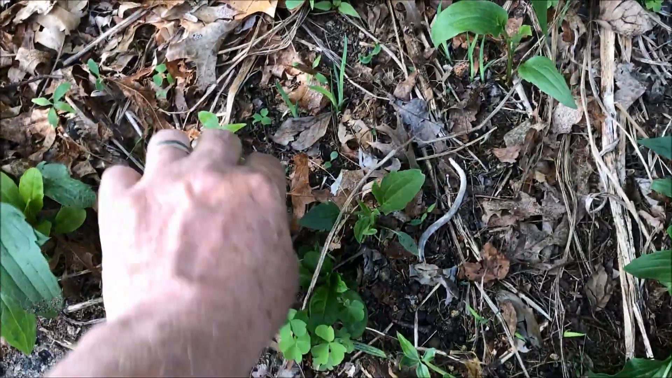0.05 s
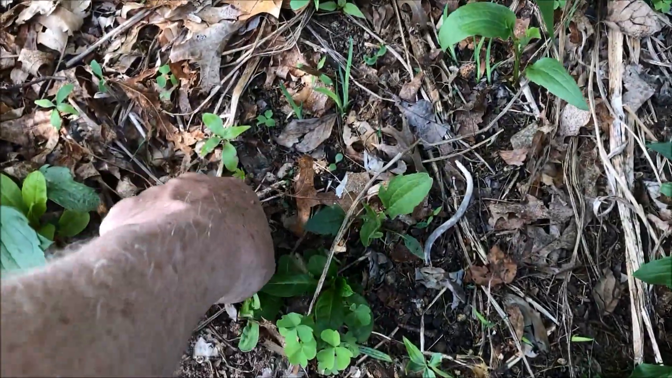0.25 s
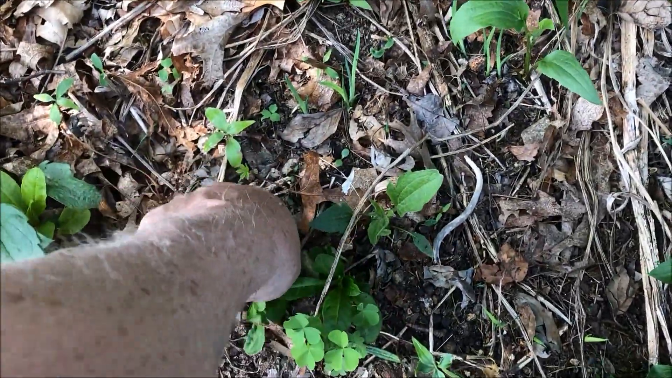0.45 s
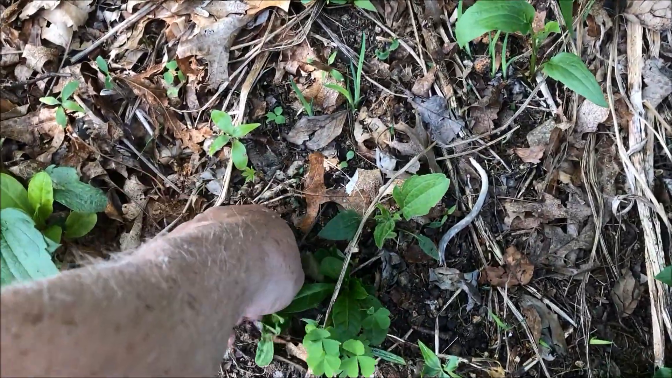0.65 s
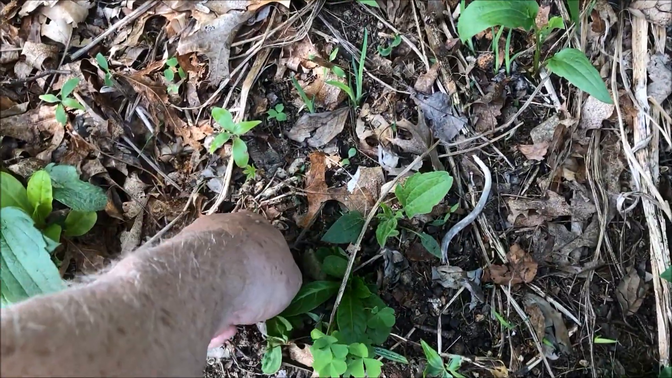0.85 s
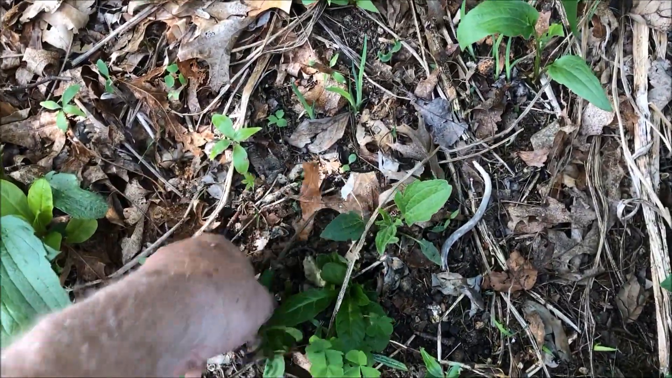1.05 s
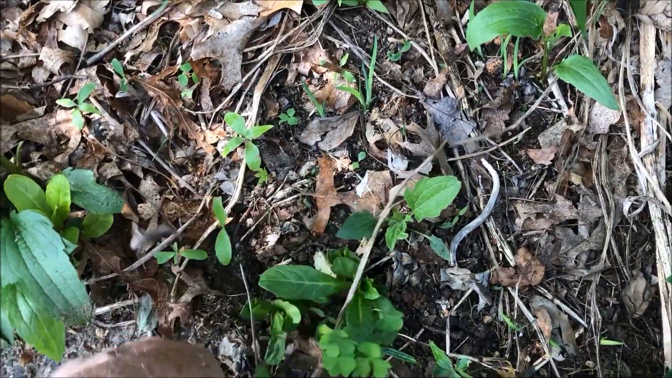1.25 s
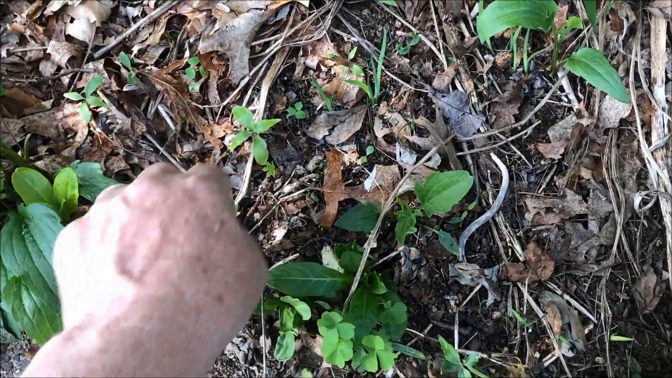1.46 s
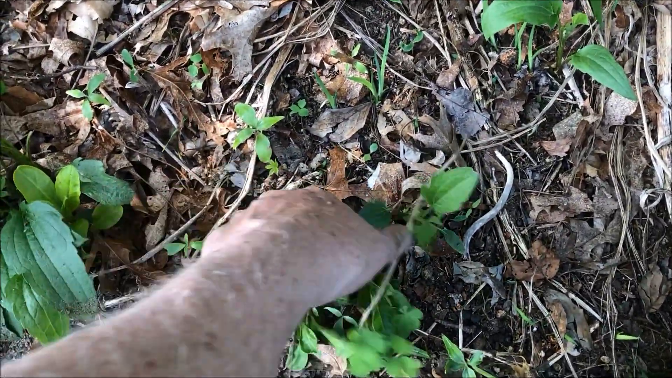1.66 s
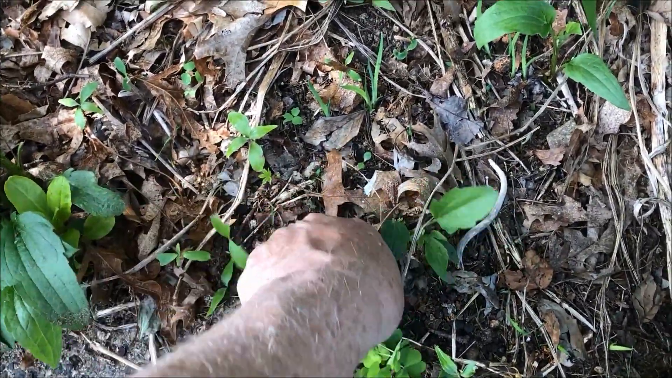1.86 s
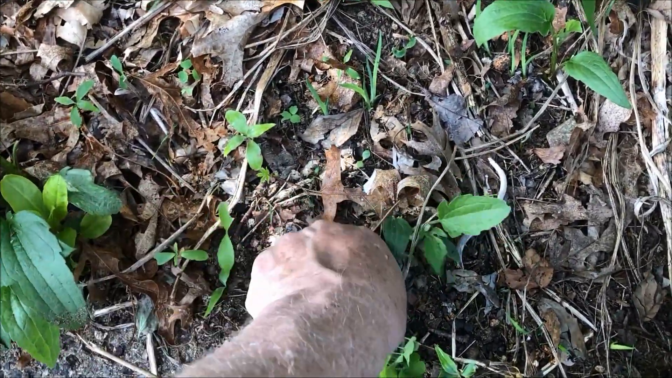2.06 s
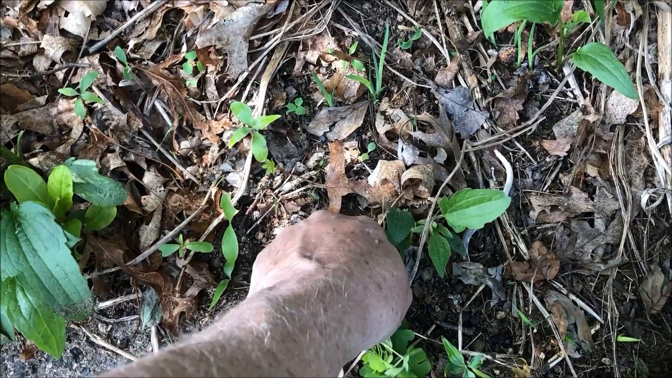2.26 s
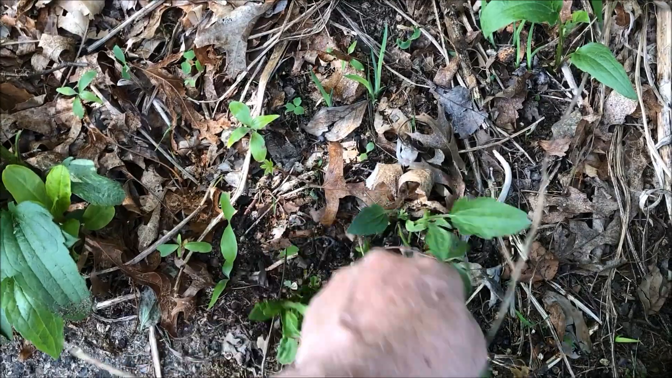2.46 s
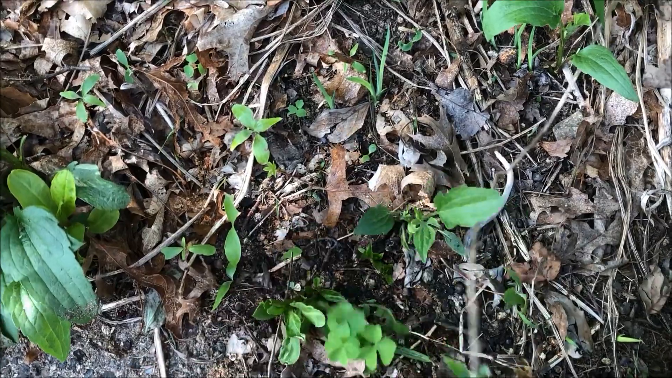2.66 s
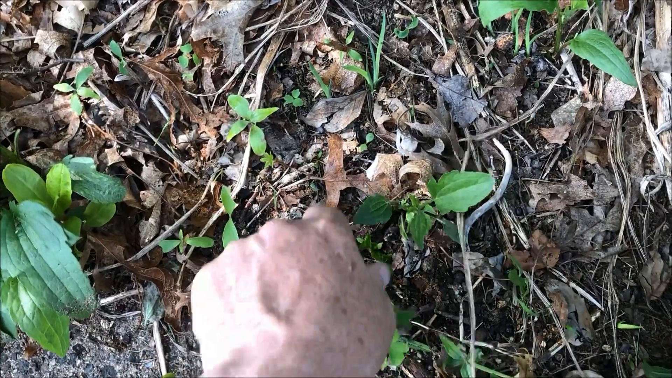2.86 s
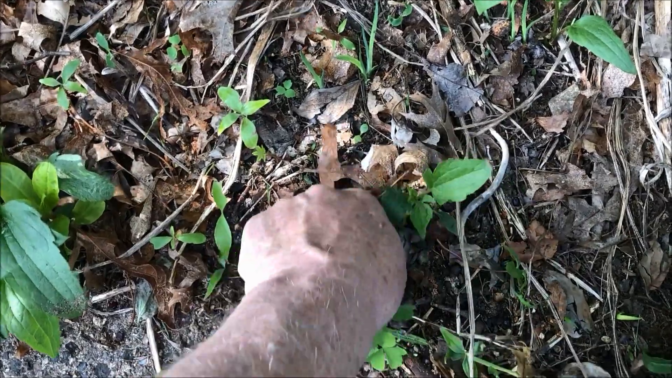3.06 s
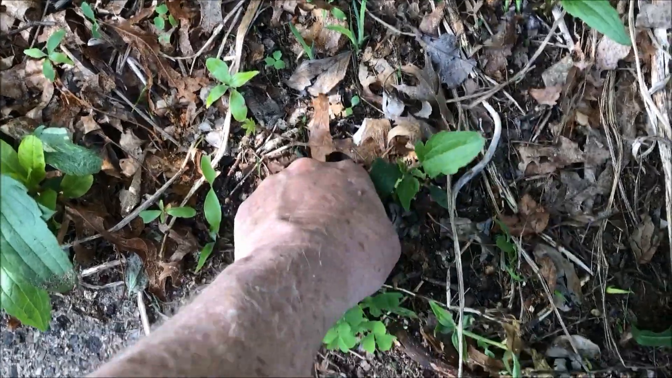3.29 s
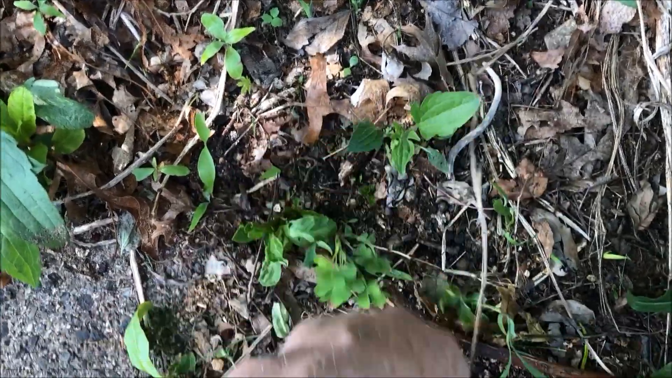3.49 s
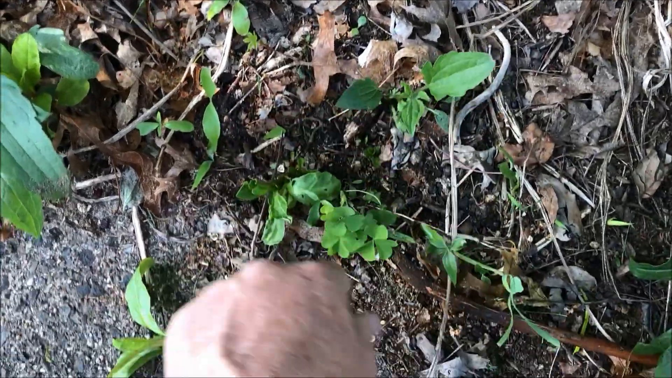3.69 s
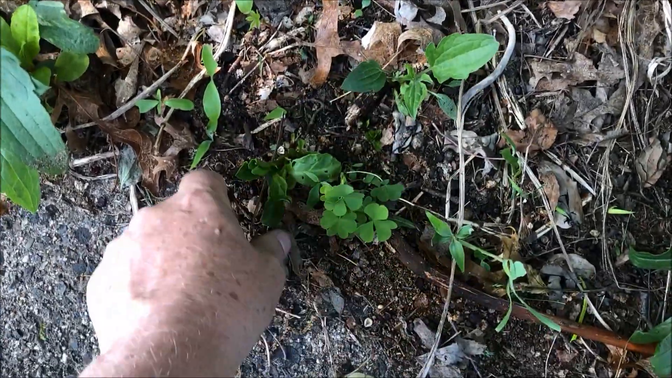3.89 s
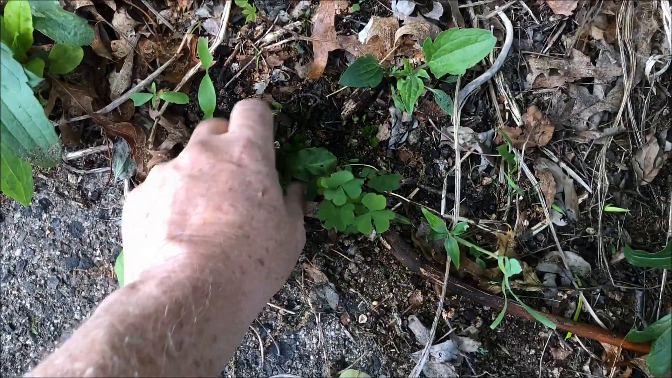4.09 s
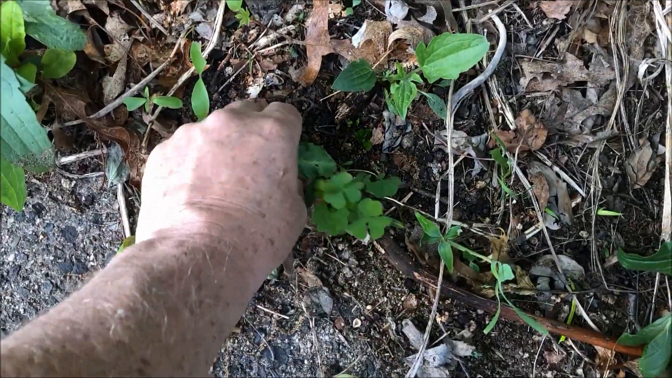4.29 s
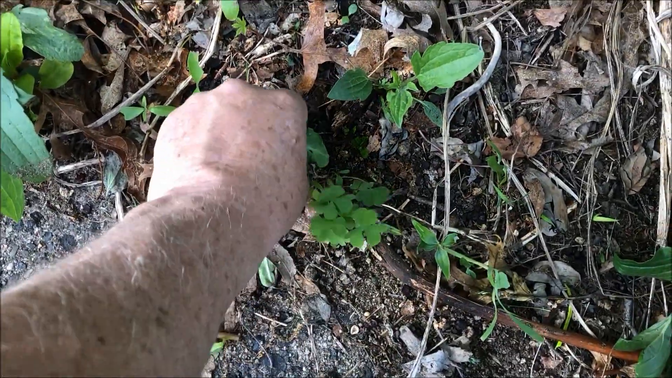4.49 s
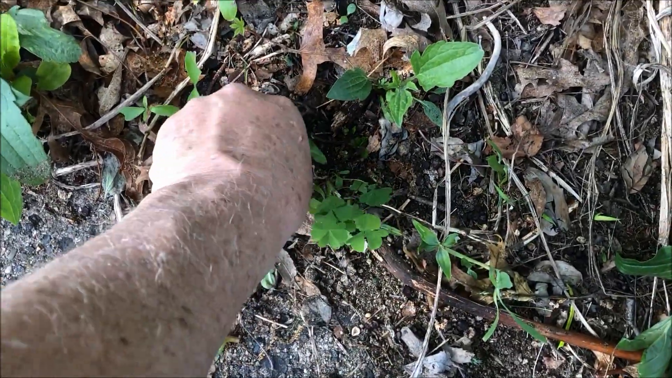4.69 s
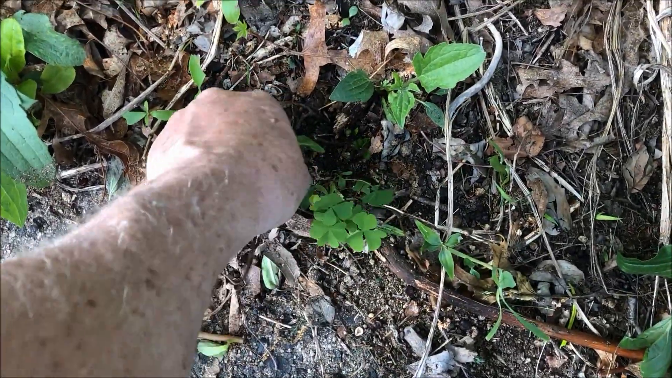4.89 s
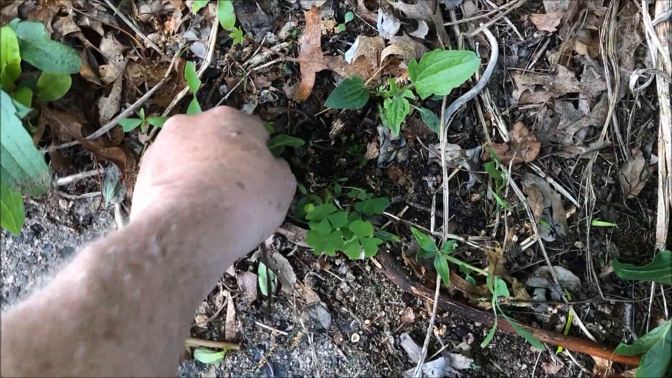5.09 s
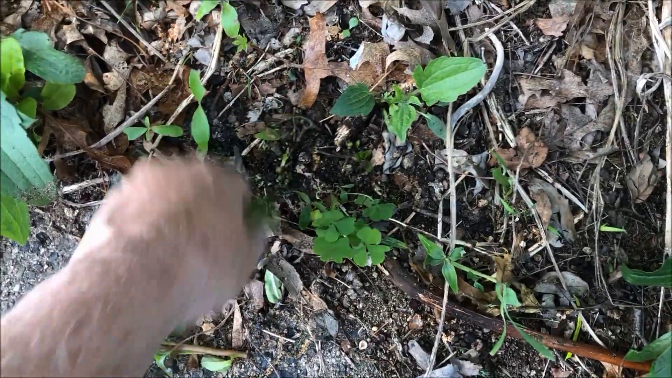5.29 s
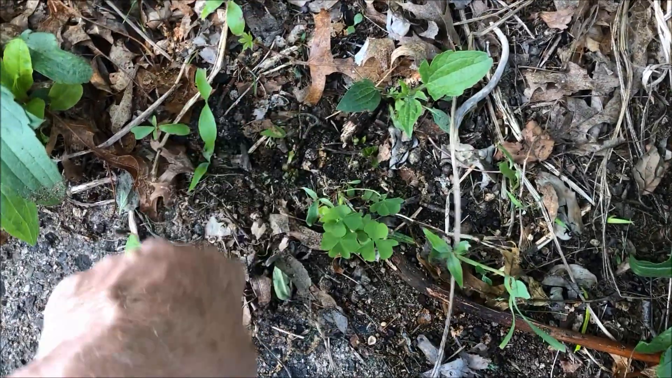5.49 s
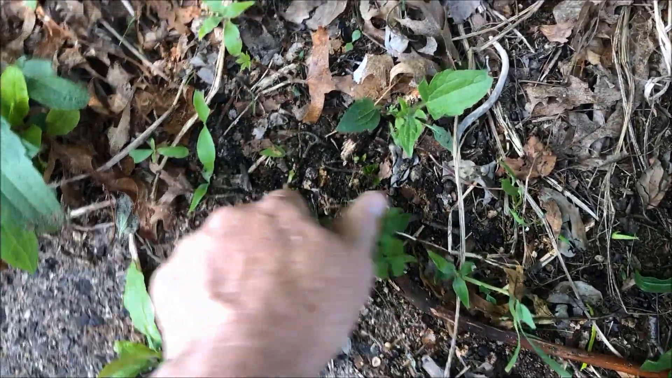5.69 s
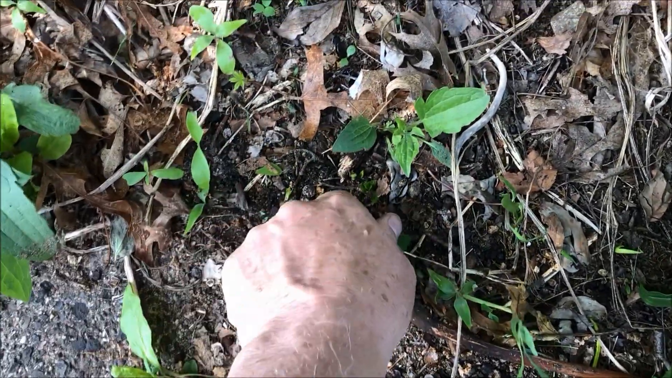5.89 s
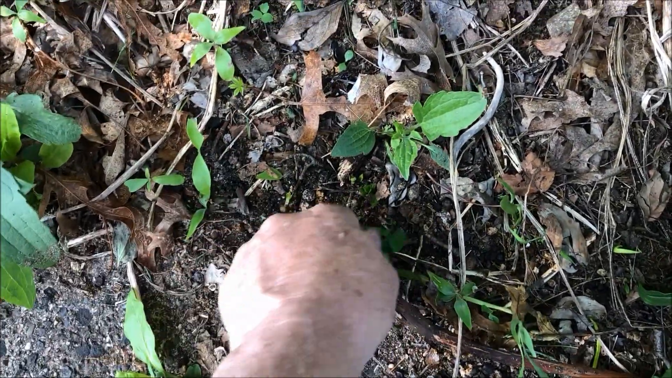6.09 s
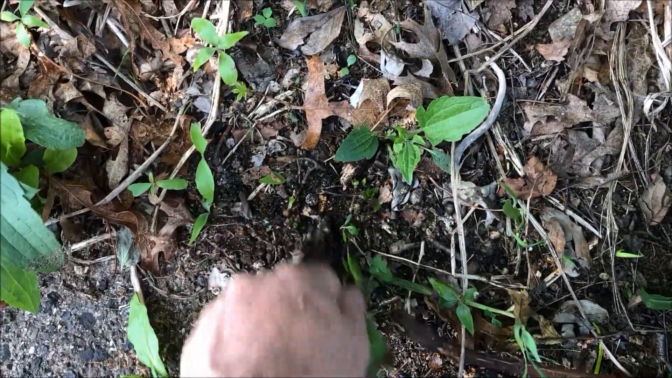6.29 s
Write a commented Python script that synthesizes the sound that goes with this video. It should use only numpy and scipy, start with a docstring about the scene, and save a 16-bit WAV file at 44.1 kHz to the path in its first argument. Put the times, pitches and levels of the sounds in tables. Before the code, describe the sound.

Close up and outdoors, a hand pulls small weeds from garden soil. Dry leaves rustle in short, uneven strokes full of tiny crisp ticks, with a duller crunch of soil crumbs and brief rubbing of stems. Roots break with a few bright snaps, each with a slight low thump, the sharpest coming late. Distant traffic rumbles softly under a faint hum.

```python
"""Pulling weeds by hand

A hand pulls small weeds out of garden soil, close up. Dry leaves and soil crumbs rustle as dense tiny
clicks with every stroke, and stems rub as they slide out. Roots and stems snap with a bright crack that
sinks into a short low thump. Far traffic rumbles under a faint hum."""
import sys
import numpy as np
from scipy import signal
from scipy.fft import rfft, irfft, next_fast_len
from scipy.io import wavfile
from scipy.ndimage import uniform_filter1d

SR = 44100
rng = np.random.default_rng(int(sys.argv[2]) if len(sys.argv) > 2 else 0)


def unload_wav(signal):
    """Save mono or channel-first audio to the path in sys.argv[1] as 16-bit WAV at rate SR, clipped to [-1, 1]."""
    wavfile.write(
        sys.argv[1],
        SR,
        np.round(np.clip(np.atleast_2d(signal).T, -1, 1) * 32767).astype(np.int16),
    )


N = 279858


def undb(db):
    return 10 ** (np.asarray(db) / 20)


def level(x, db):
    """Set the rms level."""
    return x * undb(db) / np.sqrt(np.mean(x ** 2))


def colour(x, points):
    """EQ a sound through (Hz, dB) points on a log-frequency axis."""
    size = next_fast_len(len(x))
    hz, db = np.transpose(points)
    log_hz = np.log(np.fft.rfftfreq(size, 1 / SR) + 1)
    gain = undb(np.interp(log_hz, np.log(hz), db))
    return irfft(rfft(x, size) * gain, size)[:len(x)]


def band(x, hz, width_hz):
    """One resonance."""
    return signal.lfilter(*signal.iirpeak(min(hz, SR / 3), hz / width_hz, fs=SR), x)


def drift(rate_hz):
    """Smooth random modulation with a spread near 1."""
    hold = int(SR / rate_hz)
    steps = np.repeat(rng.standard_normal(N // hold + 1), hold)
    return 1.26 * uniform_filter1d(uniform_filter1d(steps, hold), hold)[:N]


def add_at(track, start_s, sound):
    """Mix a sound into a track."""
    start = int(start_s * SR)
    track[start:start + len(sound)] += sound[:N - start]


def crackle(per_s, spread_db, t60_s):
    """Random breakages, many small and few large, each a noise grain that dies fast."""
    timing, size = rng.random((2, N))
    size_db = np.minimum(-spread_db * np.log(1 - size), 11.0)
    hits = (timing < per_s / SR) * undb(size_db)
    decay = np.exp(-2 * np.log(1000) / (t60_s * SR))
    power = signal.lfilter([1], [1, -decay], hits ** 2)
    envelope = np.sqrt(np.abs(uniform_filter1d(power, size=SR // 500)))
    return envelope * rng.standard_normal(N)


# Each brush or grip of the hand in the litter. Swell and fade span 10 dB; soil is relative to leaf.
# peak_s, leaf_gain_db, swell_s, fade_s, soil_gain_db
HAND_STROKES = [(.25, -64, .04, .3, -6.5), (0.571, -59, .15, .25, -5), (.73, -57, .1, .12, -6.5),
                (.81, -58.5, 0.08, .04, -13), (.89, -65.5, .05, 0.14, -5.5), (1.03, -53, .08, 0.23, -13),
                (1.22, -49, .08, 0.13, -19.5), (1.36, -52.5, .08, .06, -11), (1.425, -56, .05, .06, -12),
                (1.49, -60, .06, .03, -12), (1.66, -63, .02, .1, -9), (1.735, -57, .06, .03, -9),
                (1.775, -57, .05, 0.16, -9.5), (1.878, -54.5, 0.07, .05, -10), (2.031, -58, .04, .07, -8),
                (2.229, -60, 0.15, .1, -14), (2.378, -66, .04, .04, -12), (2.455, -52, .025, 0.1537, -8),
                (2.62, -46, .06, 0.0937, -13), (2.849, -58.5, .06, .05, -11), (2.95, -67, .05, .3, -14),
                (3.21, -67, .2, .06, -20), (3.42, -67.5, .04, 0.13, -8.5), (3.52, -58.5, .03, .04, -13),
                (3.61, -59.5, .05, 0.1344, -6.5), (4.125, -64, .02, .13, -26), (4.26, -62, .06, 0.04, -13),
                (4.358, -57.5, .04, .035, -13), (4.47, -66, .08, 0.1, -4), (4.68, -64, .08, 0.13, -6),
                (4.86, -63.5, .12, .1, -17), (5.0, -69, .04, .2, -20), (5.178, -57.5, .03, .035, -11),
                (5.28, -74, .05, .06, -15), (5.36, -59.5, .025, .08, -10.5), (5.47, -61.5, .05, .11, -11),
                (5.862, -58, .05, .07, -6), (6.068, -54.5, .05, .035, -9.5), (6.17, -65, .04, .04, -15),
                (6.25, -64, .05, 0.12, -15), (6.34, -61, .08, 0.17, -9)]


def hand(rest_db=-82):
    """Gain envelopes for leaves and soil: every stroke swells and fades at a steady rate in dB."""
    t = np.arange(0, N + 64, 64) / SR
    peak_s, leaf_db, swell_s, fade_s, soil_db = np.transpose(HAND_STROKES)[:, :, None]
    drop_db = 10 * np.maximum((t - peak_s) / fade_s, (peak_s - t) / swell_s)
    stroke_power = undb(leaf_db - drop_db) ** 2
    leaf_power = stroke_power.sum(axis=0) + undb(rest_db) ** 2
    soil_power = (stroke_power * undb(soil_db) ** 2).sum(axis=0)
    curves_db = [10 * np.log10(power + 1e-18) for power in (leaf_power, soil_power)]
    return [undb(np.interp(np.arange(N) / SR, t, curve)) for curve in curves_db]


# The bright, papery EQ of dry leaves.
# frequency_hz, gain_db
LEAF_EQ = [(530, -8), (900, -6.5), (1230, -17), (2350, -6), (4890, -4.5), (8980, -5.5), (15200, -4.5),
           (15900, -5), (16500, -27)]


def leaf_rustle():
    """Dry clicks over a fluttering hiss; each leaf also rings in its own band and comes and goes."""
    clicks = level(crackle(per_s=450, spread_db=3.3, t60_s=.006), -4)
    hiss = level(rng.standard_normal(N) * undb(2.4 * drift(27)), -3.5)
    leaves = clicks + hiss
    for hz in (2330, 3550, 4100, 6000, 7300, 9700, 12100):
        ring = band(crackle(per_s=250, spread_db=3.4, t60_s=.016), hz, .32 * hz)
        leaves += level(ring * undb(2.94 * drift(14)), -8)
    return level(colour(leaves, LEAF_EQ), 3.4)


def soil_drag():
    """Dragged crumbs of soil make a duller, midrange crunch."""
    crumbs = crackle(per_s=400, spread_db=3.0, t60_s=.02)
    return level(band(band(crumbs, 1800, 2400), 1800, 3000), 4)


def scratches():
    """Lone dry scratches among the rustle, in three treble colours."""
    return sum(level(band(crackle(per_s=20, spread_db=3.0, t60_s=.006), hz, .6 * hz), -13)
               for hz in (4800, 7500, 11500))


def snap(crack_hz, crack_t60_s, knock_db, knock_from_hz, knock_to_hz, thump_db=-np.inf):
    """A fibre breaks: sharp crack, splinter tail, hollow stem knock and an optional sinking thump."""
    t = np.arange(SR // 16) / SR
    crack_noise, stem_noise = rng.standard_normal((2, len(t)))

    def decay(t60_s):
        return undb(-60 * t / t60_s)

    def falling_tone(from_hz, to_hz, glide_s):
        pitch_hz = to_hz + (from_hz - to_hz) * np.exp(-t / glide_s)
        return np.sin(2 * np.pi * np.cumsum(pitch_hz) / SR)

    splinters = undb(-18) * decay(.032)
    burst = crack_noise * (decay(crack_t60_s) + splinters)
    burst[0] = 3.4  # the break itself, before the splinters
    edge = signal.lfilter(*signal.butter(2, 11000, fs=SR), np.diff(burst, prepend=0))
    ring = band(burst, crack_hz, .1 * crack_hz)
    crack = band(burst, crack_hz, .65 * crack_hz) + .09 * edge + .55 * ring
    knock = falling_tone(knock_from_hz, knock_to_hz, glide_s=.0009) * decay(.0078)
    knock += .4 * band(stem_noise * decay(.022), .8 * knock_to_hz, 900)
    thump_swell = np.exp(-((t - .0047) / .002) ** 2)  # peaks just after the crack
    thump = falling_tone(1150, 250, glide_s=.002) * thump_swell
    return crack / np.abs(crack).max() + undb(knock_db) * knock + undb(thump_db) * thump


# Roots and stems giving way in the ground. Knock and thump are relative to the crack's peak.
# start_s, crack_peak_db, crack_hz, crack_t60_s, knock_db, knock_from_hz, knock_to_hz, thump_db
ROOT_SNAPS = [(.9724, -15.5, 8140, 0.012, -8.5, 2400, 1600, -32),
              (1.041, -33, 7300, 0.013, 0.5, 1900, 1500, -16),
              (2.4196, -26, 9000, .0066, -2, 2100, 1300, -14),
              (2.4276, -16, 4200, 0.0045, 2, 2600, 620, -15),
              (3.342, -20.5, 6300, .01, -20.5, 2000, 1000, -19),
              (5.1279, -22, 4000, 0.0094, -7, 2400, 900, -18),
              (5.135, -31, 6800, 0.035, -36, 2000, 1500, -32),
              (5.1663, -7, 6200, 0.003, -13.5, 2200, 800, -23)]


def root_snaps():
    """Breaks in the ground: the big accents, each with a low thump."""
    out = np.zeros(N)
    for start_s, peak_db, *timbre in ROOT_SNAPS:
        add_at(out, start_s, undb(peak_db) * snap(*timbre))
    return out


# Dry leaves and fibres cracking above ground. The knock is relative to the crack's peak.
# start_s, crack_peak_db, crack_hz, knock_db
LEAF_TICKS = [(.6802, -38.5, 5970, -23), (.722, -39, 10000, -35), (.7407, -38, 10900, -18),
              (.7715, -28.5, 11400, -36), (0.7862, -34.5, 4500, -16), (.82, -29, 5500, -22),
              (0.8318, -26.5, 12700, -39), (.87, -40, 11000, -40), (.876, -42, 12000, -40),
              (.891, -31.5, 6900, -42), (.911, -41, 7000, -35), (.932, -41, 6000, -25),
              (.9655, -36, 11500, -40), (0.9904, -32.5, 8300, -4), (1.02, -32, 12100, -40),
              (1.0586, -34, 4900, -19), (1.072, -39, 6500, -35), (1.0795, -35, 10000, -35),
              (1.1, -40, 4500, -30), (1.1085, -35, 5000, -30), (1.112, -27, 8200, -31),
              (1.1322, -27, 11000, -32), (1.14, -23, 11100, -24), (1.1432, -24, 6500, -8),
              (1.146, -28, 10500, -25), (1.158, -35, 13500, -40), (1.188, -33, 11500, -40),
              (1.197, -27, 12000, -25), (1.22, -34, 8000, -12), (1.235, -30.5, 4350, -21),
              (1.313, -37, 6000, -30), (1.339, -38, 10000, -35), (1.3475, -36, 6200, -20),
              (1.352, -35, 6300, -25), (1.362, -36, 7500, -30), (1.372, -36, 3800, -20),
              (1.407, -39, 4000, -25), (1.422, -39, 13500, -40), (1.448, -40, 6000, -25),
              (1.498, -43, 12000, -40), (1.5168, -37.5, 5330, -40), (1.648, -46, 6000, -30),
              (1.7335, -35, 6000, -20), (1.778, -41, 8000, -35), (2.1792, -41, 9500, -35),
              (2.1836, -38.5, 8850, -21), (2.232, -33, 11900, -34), (2.287, -36, 4140, -22),
              (2.308, -42, 7000, -20), (2.3546, -26, 5850, -13), (2.4394, -31, 12700, -11),
              (2.49, -36, 8800, -11), (2.5181, -37, 6200, -21), (2.527, -35, 11000, -30),
              (2.593, -35, 13500, -30), (2.626, -33, 9500, -30), (2.677, -31, 6500, -30),
              (2.733, -39, 9000, -30), (2.8, -44, 6300, -25), (2.834, -45, 10500, -35),
              (3.222, -35, 9500, -19), (3.299, -34.5, 11600, -35), (4.099, -47, 10000, -35),
              (4.106, -43, 6100, -30), (4.125, -48, 10000, -35), (4.131, -47, 9500, -35),
              (4.137, -48, 9000, -35), (4.1507, -29.5, 8800, -14), (4.1548, -33, 9000, -15),
              (4.156, -39, 3200, -20), (4.166, -41, 12900, -31), (4.24, -47, 12000, -20),
              (4.2575, -44, 6000, -35), (4.266, -46, 9000, -35), (4.299, -43, 9000, -35),
              (4.344, -43, 8840, -35), (4.382, -47, 10000, -35), (4.465, -47, 9000, -25),
              (4.486, -48, 8000, -30), (4.5145, -48, 13000, -35), (4.611, -50, 10000, -35),
              (4.629, -43.5, 4780, -40), (4.6814, -37, 4760, -7), (4.842, -45, 4540, -30),
              (4.8615, -46, 4400, -30), (4.897, -43, 6330, -28), (4.914, -45, 6000, -25),
              (4.9258, -40, 6000, -24), (4.9325, -44, 6100, -28), (4.9524, -39, 6100, -35),
              (4.9758, -27, 6900, -40), (4.995, -50, 9000, -40), (5.0066, -46, 7300, -26),
              (5.031, -28.5, 9200, -30), (5.0365, -40, 10000, -40), (5.0881, -39, 11900, -24),
              (5.107, -49, 11000, -40), (5.3477, -38, 5360, -30), (5.388, -42, 4600, -30),
              (5.4336, -43, 4300, -12), (5.4507, -38, 7000, -34), (5.489, -46, 5850, -31),
              (5.519, -38.5, 8000, -40), (5.6395, -42.5, 6600, -24), (5.811, -38.5, 6200, -22.5),
              (5.846, -41, 8000, -35), (5.858, -35.5, 12300, -19), (5.875, -37.5, 7200, -37),
              (6.036, -41, 7000, -35), (6.0493, -38.5, 4860, -21), (6.0985, -43, 3400, -14),
              (6.118, -44, 5000, -20), (6.176, -46, 5500, -30), (6.2547, -38, 4000, -9.5),
              (6.3132, -35.5, 4500, .3), (6.332, -42, 6500, -15)]


def leaf_ticks():
    """Breaks above ground: light, crisp snaps with no thump."""
    out = np.zeros(N)
    for start_s, peak_db, crack_hz, knock_db in LEAF_TICKS:
        tick = snap(crack_hz, crack_t60_s=.0085, knock_db=knock_db, knock_from_hz=2300, knock_to_hz=1600)
        add_at(out, start_s, undb(peak_db) * tick)
    return out


# Stems sliding out through leaves and soil.
# start_s, length_s, from_hz, to_hz, width_hz, level_db
STEM_SLIDES = [(1.195, 0.008, 5100, 5000, 200, -42), (1.212, 0.035, 4500, 4300, 400, -56),
               (2.595, 0.044, 1400, 1150, 700, -53), (2.56, 0.04, 5500, 5300, 630, -56),
               (2.605, 0.03, 4700, 4500, 500, -52), (.78, 0.023, 4600, 4500, 300, -60),
               (1.044, .007, 7400, 7300, 300, -48), (4.318, .025, 2500, 2450, 250, -67)]


def stem_slides():
    """Rough rubbing excites one narrow resonance that sinks as the free stem gets longer."""
    out = np.zeros(N)
    for start_s, length_s, from_hz, to_hz, width_hz, level_db in STEM_SLIDES:
        n = int(length_s * SR)
        friction = uniform_filter1d(rng.standard_normal((2, SR // 8)), int(SR / width_hz))[:, :n]
        phase = 2 * np.pi * np.cumsum(np.linspace(from_hz, to_hz, n)) / SR
        ring = friction[0] * np.cos(phase) + friction[1] * np.sin(phase)
        add_at(out, start_s, level(ring * np.sqrt(np.hanning(n)), level_db))
    return out


# The bass-heavy EQ of distant traffic.
# frequency_hz, gain_db
TRAFFIC_EQ = [(20, -35), (32, -29), (50, -8), (75, -2.5), (150, -6), (260, -9.5), (480, -20), (1300, -28),
              (4500, -33.5), (15000, -62)]


def far_traffic():
    """A gently swaying bed of rumble that thins into hiss."""
    rumble = colour(rng.standard_normal(N), TRAFFIC_EQ)
    return level(rumble, -56) * undb(.7 * drift(1.5))


def mains_hum(pitch_hz=119):
    """A faint low tone that wavers in pitch and level."""
    phase = 2 * np.pi * np.cumsum(pitch_hz + 1.453 * drift(6)) / SR
    return level(np.sin(phase), -66) * undb(2.6 * drift(5.3))


def scene():
    """Mono mix: the rustle follows the hand; slides, snaps and background add to it."""
    leaf_gain, soil_gain = hand()
    rustle = leaf_gain * leaf_rustle() + soil_gain * soil_drag() + leaf_gain * scratches()
    weeding = rustle + stem_slides() + root_snaps() + leaf_ticks()
    return (weeding + far_traffic() + mains_hum())[None]


def record(dry, cutoff_hz=15850):
    """A phone's steep low-pass cuts the very top."""
    return signal.sosfilt(signal.ellip(10, .2, 70, cutoff_hz, fs=SR, output="sos"), dry)


dry = scene()
out = record(dry)
unload_wav(out)
```